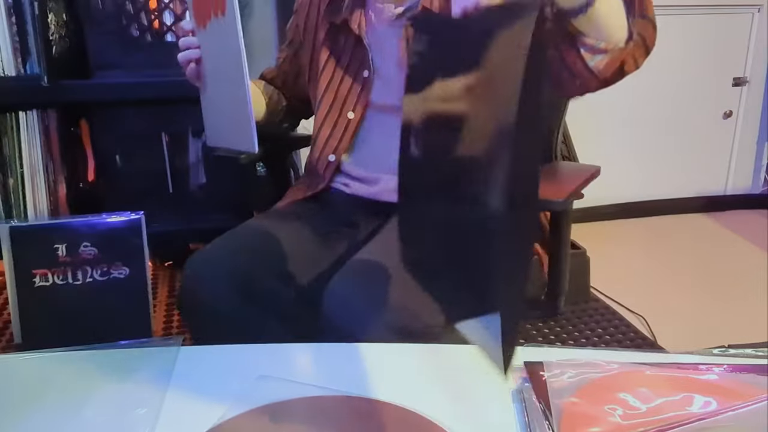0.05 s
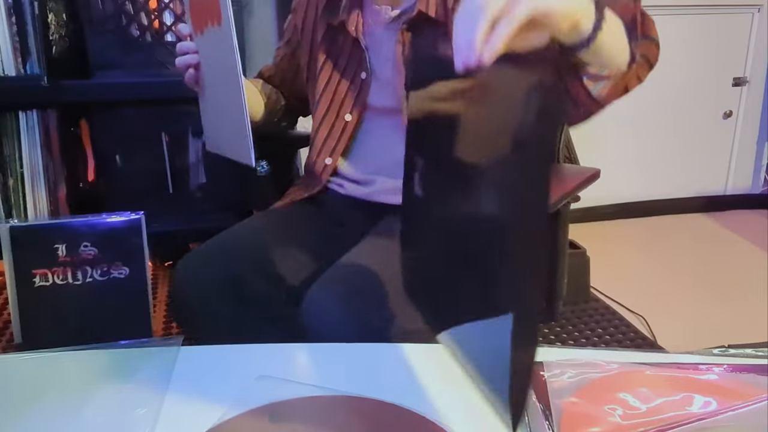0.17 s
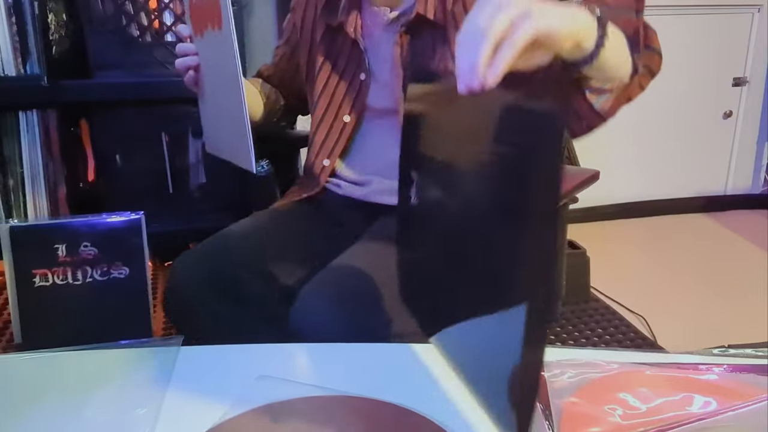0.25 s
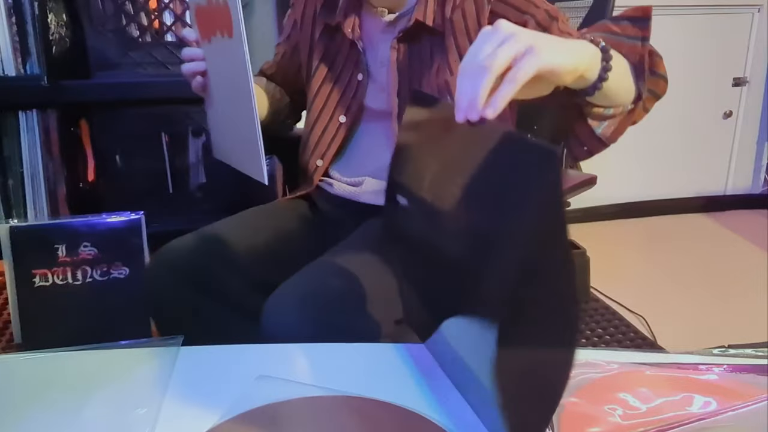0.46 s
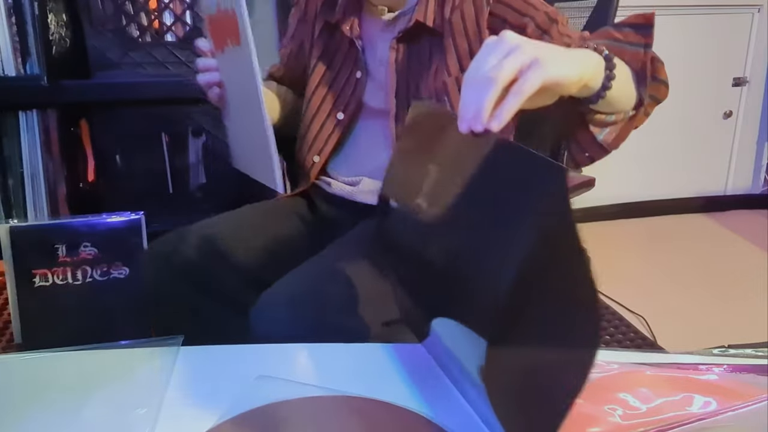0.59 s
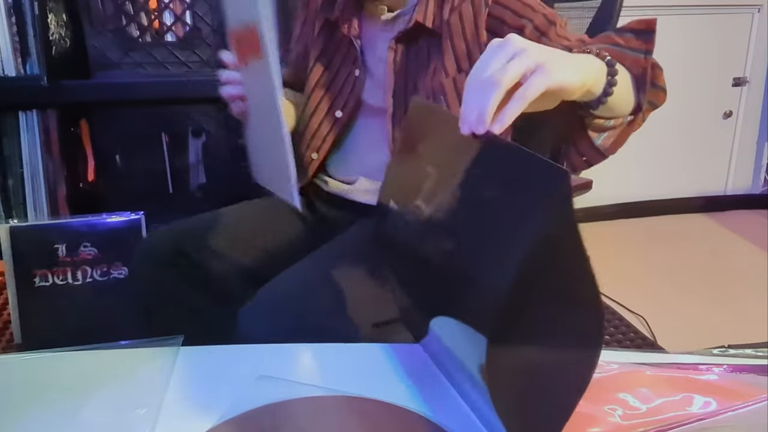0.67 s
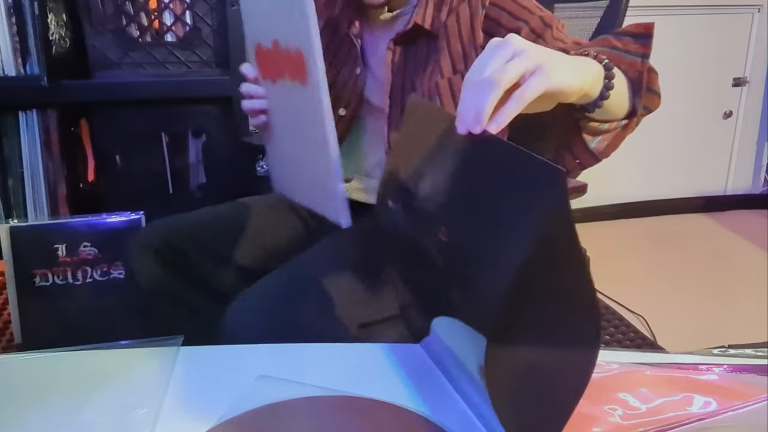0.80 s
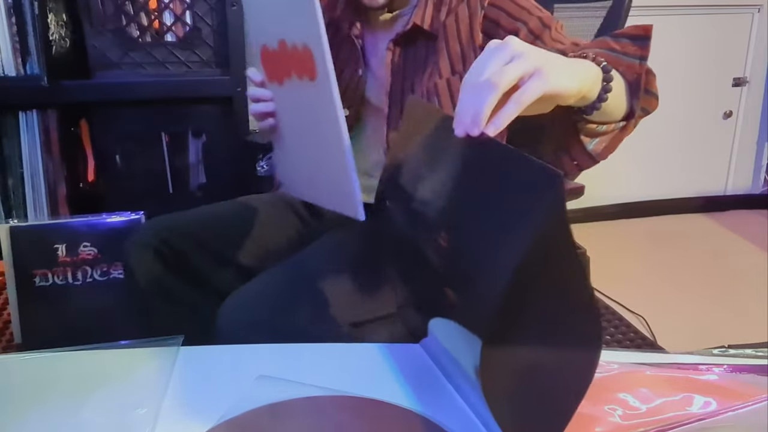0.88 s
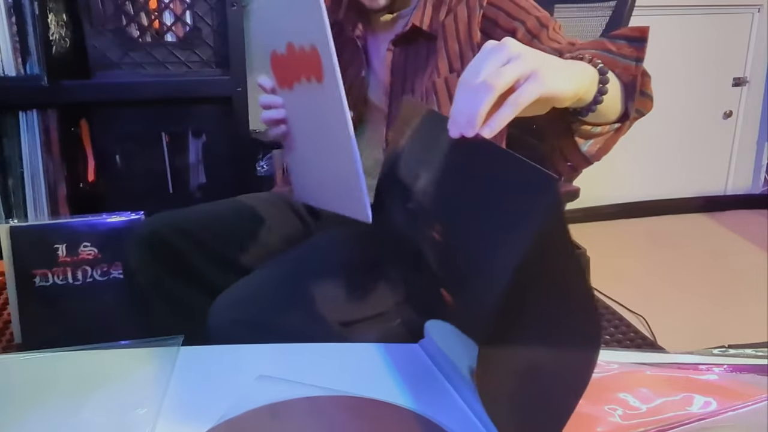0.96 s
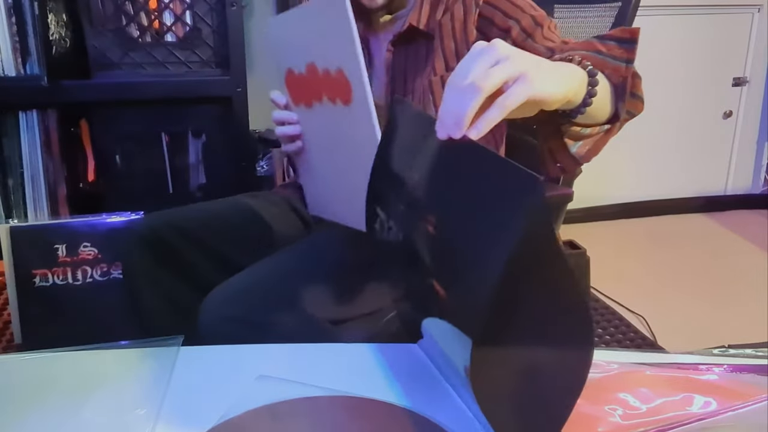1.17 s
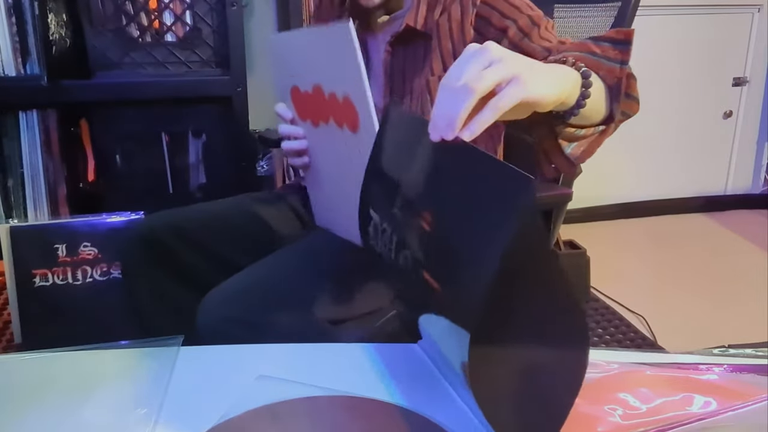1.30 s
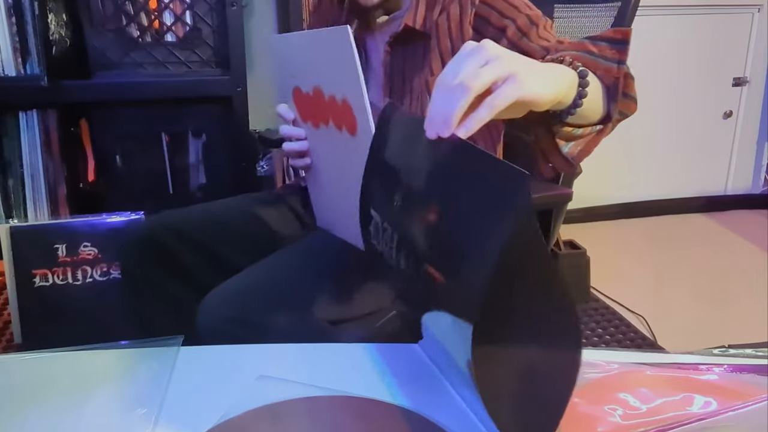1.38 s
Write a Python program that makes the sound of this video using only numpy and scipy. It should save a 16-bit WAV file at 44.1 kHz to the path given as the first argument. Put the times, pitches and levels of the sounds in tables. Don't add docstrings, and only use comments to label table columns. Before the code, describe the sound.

A cardboard record jacket slaps down on a table, then a paper sleeve slides out softly

```python
import sys
import numpy as np
from scipy import signal
from scipy.io import wavfile

SR = 44100
rng = np.random.default_rng(int(sys.argv[2]) if len(sys.argv) > 2 else 0)


def voltage_ratio(decibels):
    exponent = np.asarray(decibels, float) / 20
    return 10 ** exponent


def pcm_store(signal):
    levels = np.round(np.clip(np.atleast_2d(signal), -1, 1) * 32767)
    wavfile.write(sys.argv[1], SR, levels.astype(np.int16).T)


N = 63945
TIME = np.arange(N) / SR


def rms_one(x):
    return x / np.sqrt(np.mean(x ** 2) + 1e-20)


def in_time(rows):
    return voltage_ratio(np.interp(TIME, *np.transpose(rows)))


def drift(rate_hz):
    r = np.exp(-80 * np.pi * rate_hz / SR)
    slow = signal.lfilter([1], [1, -2 * r, r * r], rng.standard_normal(N // 40 + 2002))[2000:]
    return np.interp(np.arange(N) / 40, np.arange(len(slow)), rms_one(slow))


def butter(order, hz, kind, x):
    return signal.sosfilt(signal.butter(order, hz, kind, fs=SR, output="sos"), x)


def ring(x, hz, t60):
    r, w = voltage_ratio(-60 / (t60 * SR)), 2 * np.pi * hz / SR
    return signal.lfilter([0, np.sin(w)], [1, -2 * r * np.cos(w), r * r], x + 1e-18)


def bands(spectrum):
    edges = 30 * 2 ** np.arange(0, 9.6, .5)
    centres = np.sqrt(edges[1:] * edges[:-1])
    hz, db = np.transpose(spectrum)
    white = rng.standard_normal((2, N))
    out = np.array([butter(2, edges[k:k + 2], "band", white[k % 2]) for k in range(len(centres))])
    out = out * voltage_ratio(np.interp(np.log(centres), np.log(hz), db))[:, None]
    return out / np.sqrt(np.mean(out.sum(0) ** 2)), centres


def resonant_noise(lines):
    white, out = rng.standard_normal(N), np.zeros(N)
    for k, (hz, width_hz, db) in enumerate(lines):
        out += voltage_ratio(db) * rms_one(ring(white, hz, 3.5 / width_hz)) * (-1) ** k
    return rms_one(out)


def swell(t, hz):
    return 1 - np.exp(-t / (0.0025 * (hz / 300) ** -1.13 + 0.000052))


def knock(hits, modes, spread_db, in_step=False):
    out, length = np.zeros(N), SR // 2
    chance = rng.standard_normal((len(hits), len(modes)))
    signs = rng.choice([-1] if in_step else [-1, 1], chance.shape)
    for (s, db, cut_hz), row, sign in zip(hits, chance, signs):
        i = int(s * SR)
        push = butter(2, cut_hz, "low", np.eye(1, length)[0])
        sound = np.zeros(length)
        for (hz, mode_db, t60), c, g in zip(modes, row, sign):
            level = g * voltage_ratio(db + mode_db + spread_db * c)
            sound += level * ring(push, hz, t60) * swell(TIME[:length], hz)
        out[i:i + length] += sound[:N - i]
    return out


# multiple [of 60 Hz], level_db [dB rms]
HUM = [(1, -78), (3, -60), (4, -78), (5, -68), (7, -68), (9, -75), (11, -73), (13, -72), (15, -81),
       (17, -80), (19, -80)]
# pitch_hz [Hz], level_db [dB]
FLOOR = [(30, -4.5), (60, -5.5), (130, -4), (250, -11), (700, -7.5), (2000, -20.5), (4500, -29),
         (15500, -29)]


def background():
    hum = np.zeros(N)
    for multiple, db in HUM:
        hum += np.sqrt(2) * voltage_ratio(db) * np.sin(2 * np.pi * (multiple * 60 * TIME + rng.random()))
    return hum * voltage_ratio(-1) + voltage_ratio(-62) * bands(FLOOR)[0].sum(0)


def room(x):
    t60_s, wall_cut_hz = 0.34, 5100
    out, dull = np.zeros(N), np.exp(-2 * np.pi * wall_cut_hz / SR)
    for k, lag in enumerate((rng.uniform(0.013, .04, 10) * SR).astype(int)):
        loop, gain, state = x.copy(), voltage_ratio(-60 * lag / SR / t60_s), [0.]
        for i in range(lag, N, lag):
            back, state = signal.lfilter([gain * (1 - dull)], [1, -dull], loop[i - lag:i], zi=state)
            loop[i:i + lag] += back[:N - i]
        out += (loop - x) * (-1) ** k
    return out


# time_s [s], level_db [dB]
HAND_LEVEL = [(0, -101), (.2, -56), (.4, -69), (.6, -62), (.8, -60), (1.0, -63.5), (1.2, -67),
              (1.45, -72.5)]


def hands(lumpy_db):
    rumble = rms_one(butter(2, [97, 159.4], "band", rng.standard_normal(N)))
    return in_time(HAND_LEVEL) * voltage_ratio(lumpy_db * drift(4)) * rumble


# start_s [s], level_db [dB], contact_cut_hz [Hz]
NUDGES = [(.4, -33, 310), (.52, -55, 402), (.558, -38, 260), (.62, -45.5, 405), (.66, -47, 254),
          (.715, -43.5, 259), (.84, -46, 245.5), (.895, -48.5, 250), (1.38, -46.5, 302), (1.43, -59, 298)]
# pitch_hz [Hz], level_db [dB], t60_s [s]
TOP_MODES = [(91, -17, 0.056), (112.9, -14, 0.2), (132, 2, 0.13), (227, 2.5, 0.052), (280.2, -4.5, 0.12),
             (508.5, -6, 0.62)]


def nudges():
    return knock(NUDGES, TOP_MODES, spread_db=0.5)


# start_s [s], level_db [dB], contact_cut_hz [Hz]
LANDINGS = [
    (.208, -24.5, 403),
    (.25, -16, 300),
]
# pitch_hz [Hz], level_db [dB], t60_s [s]
BOOM_MODE = [(134.35, -6, 0.39)]


def table_boom():
    return knock(LANDINGS, BOOM_MODE, spread_db=-3.0)


# centre_s [s], length_s [s], level_db [dB]
PUFFS = [(0.318, 0.012, -60.5), (0.348, 0.014, -64), (0.395, 0.048, -66), (0.45, 0.022, -73)]
# pitch_hz [Hz], width_hz [Hz], level_db [dB]
WHISTLES = [(5440, 270, -6), (6670, 720, 3.5), (8540, 600, -1), (9800, 270, -4.5)]


def whistles(flutter_db):
    gate = sum(voltage_ratio(db) * np.exp(-2 * ((TIME - s) / length) ** 2) for s, length, db in PUFFS)
    return gate * voltage_ratio(flutter_db * drift(30)) * butter(2, 4000, "high", resonant_noise(WHISTLES))


# start_s [s], level_db [dB], pitch_hz [Hz], t60_s [s]
TICKS = [(0.2074, -44.5, 10100, 0.011), (0.2181, -47, 6960, .012), (0.2338, -47, 6900, .008),
         (.2455, -46, 8110, 0.016), (0.2517, -70, 6660, 0.021), (0.2384, -44, 6000, 0.0092),
         (.2505, -59, 4500, .01), (0.971, -68.5, 3800, .04), (0.98, -68, 3630, 0.028),
         (1.3708, -59, 2680, 0.012), (1.404, -65.5, 1600, 0.02)]


def ticks():
    out, t = np.zeros(N), TIME[:2000]
    white = rng.standard_normal((len(TICKS), 2000))
    for (s, db, hz, t60), w in zip(TICKS, white):
        i = int(s * SR)
        burst = rms_one(butter(2, [hz * .62, min(hz * 1.6, .45 * SR)], "band", w))
        out[i:i + 2000] += burst * voltage_ratio(db + 1.5 - 60 * t / t60) * swell(t, hz)
    return out


# start_s [s], level_db [dB], pitch_hz [Hz]
SNAPS = [(0.2322, -30, 6006), (0.4997, -47, 7060), (0.5123, -37.5, 6500), (1.3879, -47, 920),
         (1.3916, -43.5, 1200), (1.3951, -48.5, 750)]


def snaps():
    out = np.zeros(N)
    for s, db, hz in SNAPS:
        i = int(s * SR)
        pulse = butter(2, [hz * .55, hz * 1.6], "band", np.eye(1, 1000)[0])
        pulse = butter(2, hz * 1.8, "low", pulse)
        out[i:i + 1000] += voltage_ratio(db) * pulse / np.abs(pulse).max()
    return out


# start_s [s], level_db [dB], contact_cut_hz [Hz]
FLICKS = [
    (1.3672, -56, 9050),
    (1.3688, -59, 8150),
]
# pitch_hz [Hz], level_db [dB], t60_s [s]
CORNER_MODES = [(3320, 0.5, 0.014), (4140, 3.5, 0.022), (4550, -8, .012), (5560, -2, 0.017),
                (7100, -3, .012)]


def nail_flicks():
    return knock(FLICKS, CORNER_MODES, spread_db=-2.5)


# time_s [s], level_db [dB]
SLIDE = [(.2, -78), (.26, -41.5), (.33, -50.5), (.39, -44.5), (.46, -44), (.54, -50), (.61, -59),
         (.7, -67.5), (.95, -75.5)]
# pitch_hz [Hz], level_db [dB per Hz]
RUB = [(150, -1), (300, -6.5), (700, -13), (1500, -13.5), (3200, -18), (4500, -27.5), (8000, -39.5),
       (14000, -54.5)]
# pitch_hz [Hz], width_hz [Hz], level_db [dB]
SLEEVE_LINES = [(521.3, 22, 5), (674.5, 22, 0.5), (892, 35, 5), (1220, 59, 4), (1420, 29.9, -0.5),
                (1600, 50, 1), (1754, 20, -1.5), (1970, 20, -3.5), (2240, 43, -6.5), (2977, 70, -4.5),
                (3360, 120, -6.5)]


def sleeve(patchy_db, grain_db):
    noise, centres = bands(RUB)
    level, shared = in_time(SLIDE), drift(25)
    fade_db = 20 * np.log10(level / level.max())
    rub = np.zeros(N)
    for band, hz in zip(noise, centres):
        dulling_db = fade_db * 0.088 * max(np.log2(hz / 2000), 0)
        rub += band * voltage_ratio(patchy_db * (.6 * shared + drift(4.7)) + dulling_db)
    return level * voltage_ratio(grain_db * drift(152)) * (rub + voltage_ratio(1) * resonant_noise(SLEEVE_LINES))


# start_s [s], level_db [dB], contact_cut_hz [Hz]
SOFT_HITS = [(0.3001, -27.5, 807), (.308, -21.5, 800), (0.316, -47, 780), (0.323, -24.5, 760),
             (.335, -26, 900), (.345, -22.5, 760), (.395, -48, 606), (0.422, -46.5, 594), (1.328, -58, 700),
             (1.362, -72, 900), (1.373, -53, 890), (1.3865, -47, 900), (1.395, -67, 900), (1.402, -62, 728)]
# pitch_hz [Hz], level_db [dB], t60_s [s]
LOOSE_MODES = [(235, -1.5, 0.044), (316.5, -0.5, 0.072), (421, 2, 0.061), (511, -13, 0.18),
               (532, 8.5, 0.02), (604, -12.5, 0.21), (950, -34, .05), (1200, -21, 0.017)]


def soft_rebounds():
    return knock(SOFT_HITS, LOOSE_MODES, spread_db=2.0)


# start_s [s], level_db [dB], contact_cut_hz [Hz]
EDGE_HITS = [(.2071, -25, 6000), (.2093, -16, 5500), (.2186, -18, 5000), (.2255, -31.5, 1209),
             (.2316, -32.5, 6000)]
# pitch_hz [Hz], level_db [dB], t60_s [s]
EDGE_MODES = [(157, -7.5, 0.15), (213, -1.5, 0.1), (403, -10.5, .03), (600, -13.5, 0.03),
              (891.5, -6.5, 0.091), (1227, -11, 0.03), (1420, 0.5, 0.016), (1537, 5.5, 0.015),
              (1710, -3.5, 0.036), (2060, -11.5, 0.047), (2200, -11.5, 0.07), (2703, -13.5, 0.048),
              (3025, -17.5, 0.05), (4500, -22.5, 0.04)]


def edge_landing():
    return knock(EDGE_HITS, EDGE_MODES, spread_db=4.5, in_step=True)


# start_s [s], level_db [dB], contact_cut_hz [Hz]
FLAT_HITS = [(0.2395, -3.5, 4500), (0.2421, -23, 4000), (0.2444, -15.5, 3007), (.2485, -7, 1500),
             (0.255, -13.5, 915.5), (0.2619, -20, 700), (0.273, -21, 1600)]
# pitch_hz [Hz], level_db [dB], t60_s [s]
PANEL_MODES = [(189, -13, 0.091), (292.3, -8, 0.091), (458, -18.5, 0.06), (531.6, -6, 0.12),
               (609, -14, .09), (789.5, -8, 0.041), (890, -5.5, 0.035), (1012, -11.5, 0.05),
               (1200, -6.5, 0.021), (1378, -7.5, 0.057), (1795, -16, 0.05), (2022, -13.5, .04),
               (2260, -18.5, 0.04), (3067, -11, 0.02)]


def flat_slap():
    return knock(FLAT_HITS, PANEL_MODES, spread_db=4.5, in_step=True)


# pitch_hz [Hz], level_db [dB per Hz]
CRACK = [(60, -46.5), (130, -19), (300, -2.5), (700, -1), (1500, -11.5), (2800, -8.5), (5000, -36.5),
         (15000, -51)]


def board_crack():
    noise, centres = bands(CRACK)
    hz = centres[:, None]
    t60 = 0.1 * (hz / 1000) ** -0.6
    edge = [(s, db + 4, cut_hz) for s, db, cut_hz in EDGE_HITS]
    out = np.zeros(N)
    for s, db, cut_hz in edge + FLAT_HITS + SOFT_HITS:
        i = int(s * SR)
        part = noise[:, i:i + SR // 4]
        t = TIME[:part.shape[1]]
        dull = 1 / (1 + (hz / (2 * cut_hz)) ** 2)
        decay = voltage_ratio(db - 14.5 - 60 * t / t60)
        out[i:i + SR // 4] += (part * dull * swell(t, hz) * decay).sum(0)
    return out


def scene():
    jacket = edge_landing() + flat_slap() + soft_rebounds() + board_crack()
    paper = sleeve(patchy_db=0.35, grain_db=-0.6) + whistles(flutter_db=3.0) + ticks() + snaps()
    near = jacket + paper + nail_flicks() + nudges()
    far = hands(lumpy_db=-2.5) + background() + table_boom()
    return (near + voltage_ratio(-31) * room(near) + far)[None]


def low_pass(x):
    return signal.sosfilt(signal.butter(12, 16620, fs=SR, output="sos"), x)


def record(dry):
    x = butter(3, 70, "high", dry)
    x = x / (1 + np.abs(x / 0.95) ** 4) ** .25
    x = signal.sosfilt(signal.cheby2(10, 30, 16450, fs=SR, output="sos"), x)
    return low_pass(x)


dry = scene()
out = record(dry)
pcm_store(out)
```